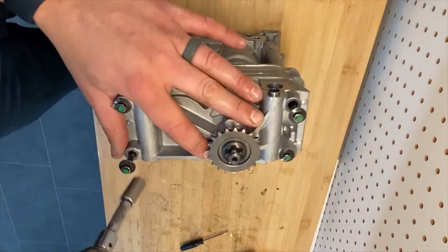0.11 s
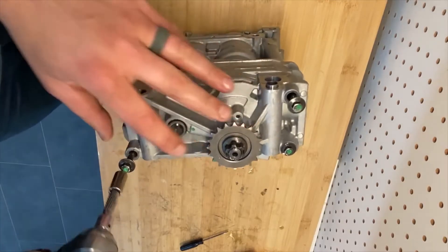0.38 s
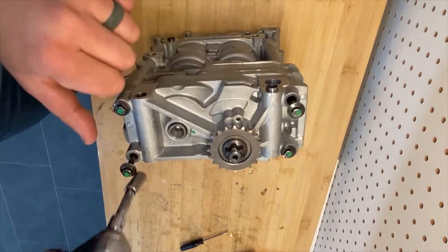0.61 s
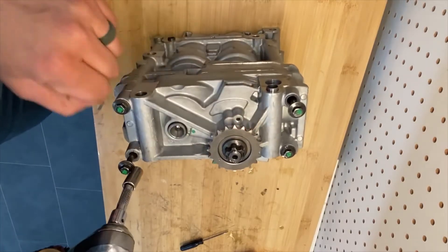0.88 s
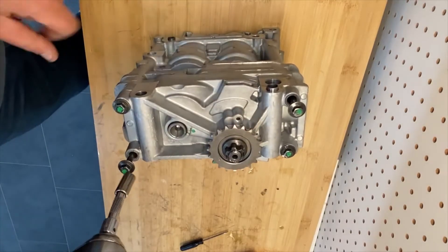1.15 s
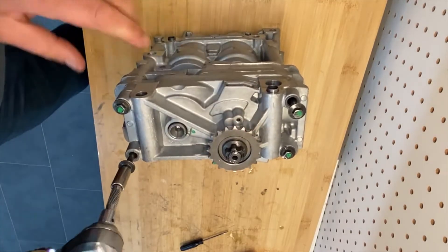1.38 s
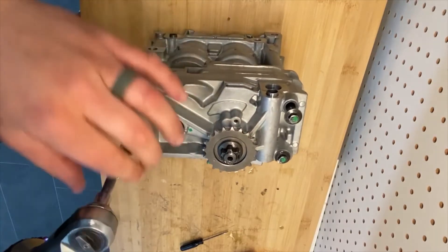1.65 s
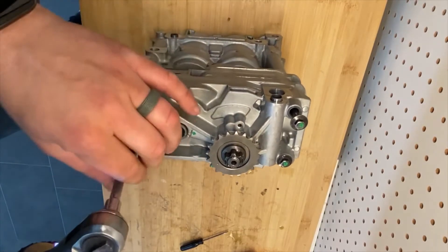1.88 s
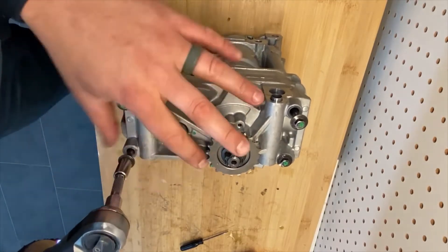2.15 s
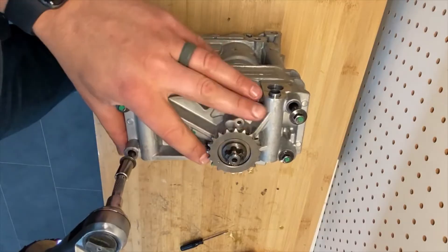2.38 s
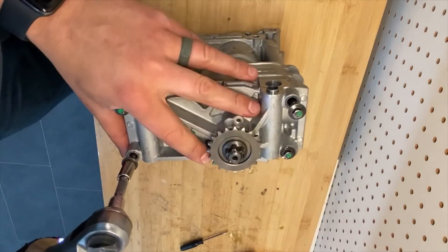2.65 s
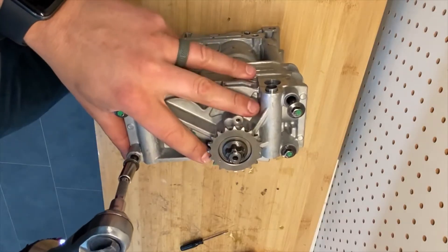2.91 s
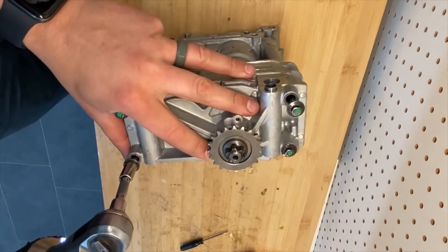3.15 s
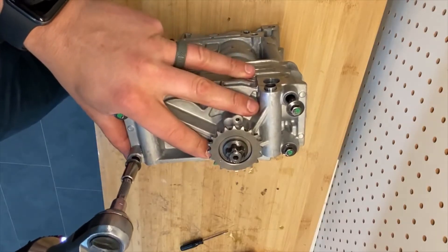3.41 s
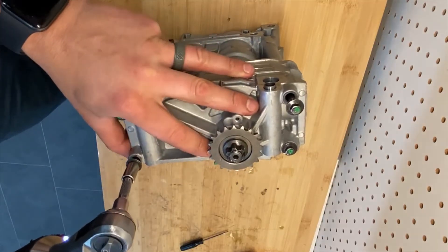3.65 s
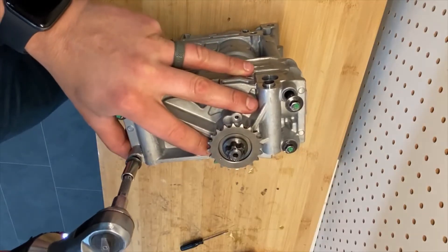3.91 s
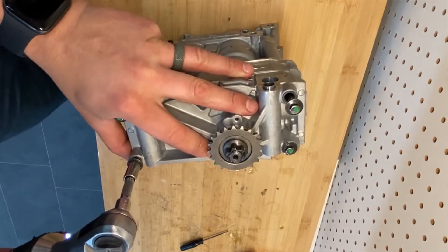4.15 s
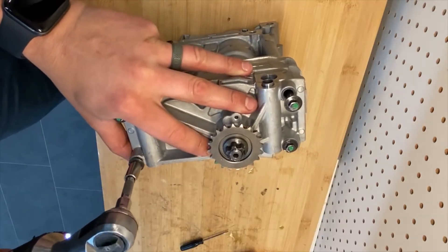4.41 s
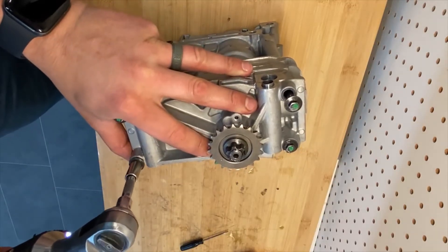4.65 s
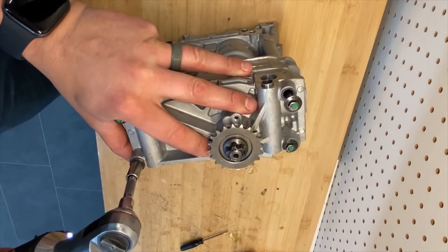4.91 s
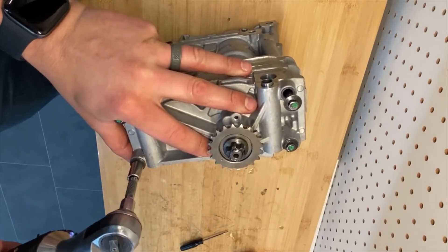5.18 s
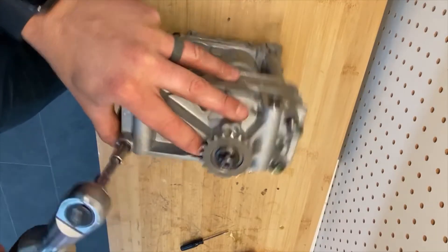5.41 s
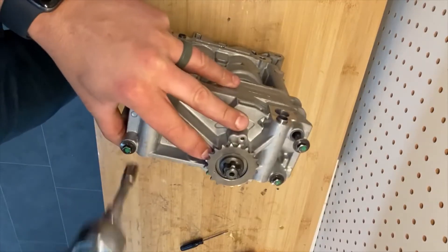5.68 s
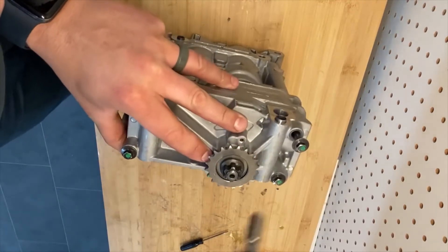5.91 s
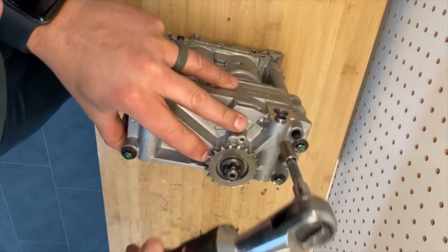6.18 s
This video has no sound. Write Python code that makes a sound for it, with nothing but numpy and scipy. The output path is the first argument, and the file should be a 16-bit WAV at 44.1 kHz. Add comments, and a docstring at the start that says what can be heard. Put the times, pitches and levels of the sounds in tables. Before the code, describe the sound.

Socket ticks and soft bench thuds, then a cordless ratchet buzzes through one four-second run, sags as the bolt seats, and clunks follow.

```python
"""First a socket ticks against bolt heads and a cast housing bumps a wooden bench, close to a two-port mic.
Then a cordless ratchet runs a bolt down: pawl chatter gated by each crank turn, over whirring gears.
The speed sags twice as the bolt seats, the housing drags on the wood, and ticks and bumps return.
Sparse clicks and noise drive resonant filters for the tool and socket; decaying sines make the bumps.
Bench rumble, air and a short shop reverberation lie behind."""
import sys
import numpy as np
from scipy import signal
from scipy.fft import rfft, irfft
from scipy.io import wavfile
from scipy.ndimage import uniform_filter1d

SR = 44100
rng = np.random.default_rng(int(sys.argv[2]) if len(sys.argv) > 2 else 0)


def how_loud(loudness_db):
    """Turn decibels into a plain amplitude multiplier (0 dB gives 1, 20 dB gives 10)."""
    steps = np.asarray(loudness_db, float) / 20
    return 10 ** steps


def dump_mix(stems):
    """Bounce the given channels to the path in sys.argv[1] as a 16-bit WAV at rate SR."""
    frames = np.atleast_2d(stems).T  # one column per channel
    limited = np.clip(frames, -1, 1)  # hard clip at full scale
    pcm = np.round(limited * 32767).astype(np.int16)
    wavfile.write(sys.argv[1], SR, pcm)


N = 277830
T = np.arange(N) / SR  # time (s)


def evened(x):
    """Scales to rms 1."""
    return x / np.sqrt(np.mean(x ** 2) + 1e-20)


def read(points, hz):
    """Reads a spectrum table along a log-frequency axis."""
    table_hz, value = np.transpose(points)
    return np.interp(np.log(hz + 1), np.log(table_hz + 1), value)


def level(rows, column=1):
    """Gain drawn along a dB column, silent outside its rows."""
    rows = np.array(rows)
    return how_loud(np.interp(T, rows[:, 0], rows[:, column], left=-200, right=-200))


def colour(x, points, rings=(), tilt_db=0):
    """Minimum-phase filter: a smooth spectrum with resonant peaks on it, tilted in dB per octave."""
    if x.ndim > 1:
        return np.array([colour(channel, points, rings, tilt_db) for channel in x])
    hz = np.fft.rfftfreq(4096, 1 / SR)
    peaks = 1 + sum(how_loud(2 * db) / (1 + (2 * (hz - f) / width) ** 2) for f, width, db in rings)
    smooth = how_loud(read(points, hz) + tilt_db * np.log2((hz + 1) / 5000))
    log_gain = np.log(smooth * np.sqrt(peaks) + 1e-5)
    full = np.r_[log_gain, log_gain[-2:0:-1]]
    taps = np.fft.ifft(np.exp(np.conj(signal.hilbert(full)))).real[:2048]
    return signal.oaconvolve(x, taps / np.linalg.norm(taps))[:len(x)]


def clicks(per_s, spread_db):
    """Sparse clicks of random sign, a few of them large; rms 1."""
    hit, size, sign = rng.random((N, 3)).T
    height = how_loud(-spread_db * np.log(size + 0.03))
    return evened((hit < per_s / SR) * height * np.sign(sign - .5))


def wander(seconds):
    """Slow random drift of rms 1, smoothed twice over the given time."""
    size = round(seconds * SR / 100)
    slow = uniform_filter1d(uniform_filter1d(rng.standard_normal(N // 100 + 2), size), size)
    return np.interp(np.arange(N) / 100, np.arange(len(slow)), evened(slow))


def hiss(points, alike):
    """Steady noise of a given colour, partly shared by the ports; rms 1."""
    shared, own = rfft(rng.standard_normal((2, N)))
    both = np.array([shared, alike * shared + np.sqrt(1 - alike ** 2) * own])
    return evened(irfft(both * how_loud(read(points, np.fft.rfftfreq(N, 1 / SR))), N))


# crank speed: spin-up, free running, two sags as the bolt seats
# columns: time_s, speed_turns_per_s
CRANK_SPEED = [(1.38, 37.78), (1.48, 73.76), (2.115, 74.545), (4.527, 74.545), (4.752, 50.18),
               (4.885, 73.41), (4.916, 76.65), (5.22, 44.66), (5.282, 54.42), (5.42, 55.9)]
START_TURN = .78  # turns
FREE_SPEED = 74.5  # turns per s


def crank():
    """Integrates speed into turns of the crank, whole at the middle of each pawl stroke."""
    s, per_s = np.transpose(CRANK_SPEED)
    return START_TURN + np.cumsum(np.interp(T, s, per_s) * (T >= s[0])) / SR


def slowed(slope_db):
    """Gain that follows crank speed, 1 at free speed; slope in dB per octave of speed."""
    return how_loud(slope_db * np.log2(np.interp(T, *np.transpose(CRANK_SPEED)) / FREE_SPEED))


def per_turn(turns, spread_db):
    """A new random gain for every crank turn."""
    return how_loud(spread_db * rng.standard_normal(400))[np.floor(turns + .5).astype(int)]


# colour of the air noise
# columns: pitch_hz, level_db
AIR_COLOUR = [(30, -6), (90, 4.5), (150, -17.5), (370, -23.5), (770, -26), (3000, -46), (10000, -54.5),
              (12500, -57.5), (13500, -90.5)]
AIR_DB = -62
HUM_HZ, HUM_DB = 372, -80.5  # a faint steady tone


def air():
    """Steady coloured noise with a faint sine under it."""
    return how_loud(AIR_DB) * hiss(AIR_COLOUR, 0.62) + how_loud(HUM_DB) * np.sin(2 * np.pi * HUM_HZ * T)


# how long the shop rings on in each band
# columns: pitch_hz, t60_s
SHOP_DECAY = [(100, 0.51), (500, 1), (1400, 0.75), (3700, 0.46), (7000, 0.44), (10000, 0.14), (13000, 0.36)]


def shop(x):
    """Reverberation: sparse taps of random sign, each band dying at its own speed, other taps per port."""
    taps = np.zeros((2, SR))
    at = np.arange(400, SR - 20, 20) + rng.integers(0, 20, (2, (SR - 401) // 20))
    np.put_along_axis(taps, at, rng.choice([-1., 1.], at.shape), 1)
    hz, t, z = signal.stft(taps, SR, nperseg=256)
    fade = how_loud(-60 * t / read(SHOP_DECAY, hz)[:, None])
    tail = signal.istft(z * fade, SR, nperseg=256)[1]
    tail /= np.linalg.norm(tail[0])
    return signal.fftconvolve(x.mean(0)[None], tail, axes=1)[:, :N]


# colour of the low noise in the bench
# columns: pitch_hz, level_db
RUMBLE_COLOUR = [(25, -21.5), (45, -10), (70, 7), (100, -4.5), (200, -1.5), (300, -18.5), (600, -26.5),
                 (1500, -48.5)]
RUMBLE_DB, RUMBLE_LUMPS_DB, RUMBLE_SLOPE_DB = -48.5, 4, 5.5  # slope: dB per octave of speed
RUMBLE_SWELL_DB, SWELL_TURNS, SWELL_DIP = -0.5, 14, .34  # dip: share of the swell cycle at its lowest
AFTER_DB, AFTER_T60_S = -14, 0.91  # the bench rumbles on after a thud: level under the thud, decay
OPENING_DB, OPENING_T60_S = -55.5, 1.2  # a low rumble at the outset, dying away


def rumble(turns):
    """Lumpy low noise in the bench: swelling while the tool runs, dying away after each thud."""
    running = (T > RUN_LEVELS[2][0]) & (T < RUN_LEVELS[-2][0])
    swell_db = RUMBLE_SWELL_DB * np.cos(2 * np.pi * (turns / SWELL_TURNS - SWELL_DIP))
    lumps_db = RUMBLE_LUMPS_DB * wander(.03)
    size = running * slowed(RUMBLE_SLOPE_DB) * how_loud(RUMBLE_DB + swell_db + lumps_db)
    size += how_loud(OPENING_DB - 60 * T / OPENING_T60_S)
    after_power = sum((T > s) * how_loud(2 * (thud_db + AFTER_DB - 60 * abs(T - s) / AFTER_T60_S))
                      for s, thud_db, _ in BENCH_BUMPS)
    return (uniform_filter1d(size, 400) + np.sqrt(after_power)) * hiss(RUMBLE_COLOUR, 0.85)


def ring(modes, rise_s):
    """Modes that swell in as the blow spreads, each blow landing elsewhere; peak 1."""
    t = np.arange(SR // 2) / SR
    spot_db = 0.96 * rng.standard_normal(len(modes))
    sound = np.zeros(len(t))
    for k, (hz, db, t60) in enumerate(modes):
        sound += (-1) ** k * how_loud(db + spot_db[k] - 60 * t / t60) * np.sin(2 * np.pi * hz * t)
    sound *= 1 - np.exp(-(t / rise_s) ** 2)
    return sound / abs(sound).max()


# the housing landing on the bench
# columns: start_s, thud_peak_db, knock_peak_db
BENCH_BUMPS = [(.029, -54, -65), (0.139, -52, -70), (0.257, -46, -61), (0.605, -33.5, -52),
               (0.698, -47.5, -64), (1.223, -40, -59), (1.378, -57, -46), (1.432, -36, -60),
               (1.496, -36, -63), (4.999, -44.5, -60.5), (5.361, -29.5, -49), (5.38, -31, -34),
               (5.40, -32, -55), (5.429, -47, -55), (5.497, -30, -38), (5.532, -37, -51),
               (5.727, -48, -70.5), (5.837, -48, -65), (5.91, -53.5, -70), (6.221, -30, -43)]
# bending modes of the bench top, heard as the thud
# columns: pitch_hz, level_db, t60_s
BENCH_MODES = [(52, -6.5, .3), (68, -0.5, .25), (96.9, 7, 0.2), (168, 0.5, 0.15), (185, 2.5, 0.11),
               (263, -5.5, 0.12)]
# modes of the cast housing, heard as the knock
# columns: pitch_hz, level_db, t60_s
HOUSING_MODES = [(330, 5, 0.078), (367, 6, 0.059), (524, -12, .06), (728, -5.5, 0.08), (937, -6.5, 0.18),
                 (1090, -6.5, 0.059), (1260, -9.5, .04)]


def bumps():
    """A short knock in the housing and a slower thud in the bench, both ringing modes."""
    out = np.zeros(N + SR)
    for s, thud_db, knock_db in BENCH_BUMPS:
        blow = how_loud(thud_db) * ring(BENCH_MODES, 0.011) + how_loud(knock_db) * ring(HOUSING_MODES, 0.0009)
        out[round(s * SR):][:SR // 2] += blow
    return out[:N]


# the housing drags round on the wood as the bolt locks
# columns: time_s, level_db
DRAG_LEVEL = [(5.2, -55.5), (5.378, -39), (5.436, -69)]
# colour of metal on wood
# columns: pitch_hz, level_db
DRAG_COLOUR = [(150, -31.5), (350, -0.5), (600, 1.5), (1100, -3.5), (1600, -4), (3000, -24)]


def drag():
    """Uneven slips of metal on wood: sparse clicks, slightly shared by the ports, through a filter."""
    slips = np.array([clicks(900, 3.0) for _ in "lr"])
    return colour((slips + 0.14 * slips[::-1]) * level(DRAG_LEVEL), DRAG_COLOUR)


# socket on bolt head
# columns: start_s, level_db, ring_hz, brightness_db_per_octave
SOCKET_TICKS = [(0.1087, -47, 11800, 3), (0.12, -50, 11700, -1.5), (0.24, -40, 11900, 3),
                (0.2515, -40.5, 7500, -0.5), (0.333, -58, 3170, 2), (0.354, -55, 7300, 1.5),
                (0.4794, -60.5, 3910, 3), (0.5424, -51, 1390, -6.5), (0.5953, -42, 3820, -1),
                (0.599, -34, 3900, 8.5), (0.607, -38, 9460, -1.5), (0.98, -53.5, 6340, 9.5),
                (1.1558, -58, 4730, 2), (1.207, -54, 11200, 2), (1.216, -44.5, 10900, 3.5),
                (1.2254, -42, 10500, 0), (1.269, -64, 1210, -5), (5.574, -54, 4880, -1),
                (5.595, -47, 4270, 5), (5.6902, -50.5, 4300, -3), (5.8538, -58, 2290, 3),
                (5.8668, -56.5, 1200, -2), (5.9656, -63, 1344, -3), (6.054, -63, 1260, -2),
                (6.0808, -59, 4310, -1.5), (6.125, -56, 1210, -7), (6.1592, -57, 5630, -1),
                (6.166, -60, 9800, 4), (6.2119, -29, 5120, 7.5), (6.2195, -26, 11000, -1),
                (6.241, -44, 1640, -12)]
# common colour of the ticks
# columns: pitch_hz, level_db
TICK_COLOUR = [(240, -33.5), (400, -8), (645, -12.5), (1200, -6.5), (3070, -3.5), (5190, -1), (8900, -8),
               (10900, -3.5), (16000, -16)]
SLIDE_S, AFTER_S = 0.0052, 0.019  # decay times of the slide and of the rattle after it
TICK_PAN_DB = 3  # left minus right


def ticks():
    """Each tick is a gritty slide of steel on steel; the casting rattles on, duller, after it."""
    length = 3000
    out, t = np.zeros((2, N + length)), np.arange(length) / SR
    pan = how_loud(np.array([[TICK_PAN_DB], [-TICK_PAN_DB]]) / 2)
    for s, db, ring_hz, bright_db in SOCKET_TICKS:
        grit = rng.standard_normal((6, length))
        chatter = how_loud(1.7 * evened(uniform_filter1d(grit[5], 40)))  # the contact skips
        slide = (grit[0] + .5 * grit[1:3]) * chatter * np.exp(-t / SLIDE_S)
        after = grit[3:5] * how_loud(-8.5) * np.exp(-t / AFTER_S)
        rings = [(ring_hz, .25 * ring_hz, 7)]
        sound = colour(slide, TICK_COLOUR, rings, bright_db)
        sound += colour(after, TICK_COLOUR, rings, bright_db - 3.0)
        attack = np.minimum(t / 0.0024, 1)
        out[:, round(s * SR):][:, :length] += how_loud(db) * pan * sound * attack / 2
    return out[:, :N]


# balance of the tool between the ports
# columns: pitch_hz, left_minus_right_db
TOOL_BALANCE = [(60, -2), (110, -4.5), (200, -17.5), (380, 3), (700, -6.5), (1290, -1), (2380, -2.5),
                (4400, 5.5), (8120, 0), (15000, -1.5)]


def ports(near, other, alike, trail):
    """The left port trails by a phase; its unlike share comes from another patch of the tool."""
    hz = np.fft.rfftfreq(N, 1 / SR)
    share = np.clip(read(alike, hz), 0, 1)
    tilt = how_loud(read(TOOL_BALANCE, hz) / 2)
    left = share * rfft(near) * np.exp(-1j * trail(hz)) + np.sqrt(1 - share ** 2) * rfft(other)
    return np.array([irfft(left * tilt, N), irfft(rfft(near) / tilt, N)])


SHAKE_DB, SHAKE_WAVER_DB, SHAKE_SLOPE_DB = -47, 2, 29.5  # rms at free speed; slope per octave of speed
SEATED_S, SEATED_DB, SEATING_S = 4.35, -8, .3  # the shake weakens: middle, change, duration


def shake(turns):
    """Once-a-turn shake in the bench: a wavering sine, weaker as the bolt comes home."""
    running = (T > RUN_LEVELS[0][0]) * (T < RUN_LEVELS[-2][0])
    size = running * slowed(SHAKE_SLOPE_DB) * how_loud(SHAKE_DB + SHAKE_WAVER_DB * wander(.03))
    size *= how_loud(SEATED_DB * np.clip((T - SEATED_S) / SEATING_S + .5, 0, 1))
    return np.sqrt(2) * size * np.sin(2 * np.pi * (turns + 0.39))


# low crank orders, before the run level is applied
# columns: multiple_of_crank_speed, level_db
CRANK_ORDERS = [(2, -60), (3, -64), (5, -67), (6, -67), (7, -71), (10, -68), (11, -71), (12, -66),
                (16, -68), (22, -69), (28, -65), (30, -66)]
WHIR_SLOPE_DB = 5.5  # loss per octave of speed as the crank slows


def crank_tones(turns):
    """Low crank orders sound as wavering sines, of independent phase at each port."""
    tones = np.zeros((2, N))
    for order, db in CRANK_ORDERS:
        waver = evened(uniform_filter1d(rng.standard_normal(N // 100 + 1), 30)).repeat(100)[:N]
        phase = 2 * np.pi * (order * turns + rng.random((2, 1)))
        tones += how_loud(db + 3 * uniform_filter1d(waver, 400)) * np.sin(phase)
    return tones * level(RUN_LEVELS) * slowed(WHIR_SLOPE_DB) / how_loud(-37.0)


# base levels from trigger to stop; the rattle drops quickly near 5.04 s
# columns: time_s, gear_whir_db, pawl_rattle_db
RUN_LEVELS = [(1.352, -80, -73), (1.372, -45, -56), (1.385, -33, -25.5), (1.42, -29.5, -22),
              (1.9, -29, -23.5), (2.1, -32, -25), (4.55, -33.5, -27), (4.57, -33, -27),
              (4.82, -35.5, -26.5), (5.03, -32, -25.5), (5.05, -34.5, -28), (5.25, -34.5, -25),
              (5.36, -29, -27), (5.4, -40, -36), (5.425, -55, -56)]
# the gears are louder through the middle of the turn
# columns: share_of_turn, level_db
MESH_LOAD = [(0, -2), (.35, 1.5), (.65, 1.5), (.76, 1.5), (.85, 0), (1, -1.5)]
# colour of the gear case
# columns: pitch_hz, level_db
GEAR_COLOUR = [(150, -48.5), (250, -20.5), (400, -14.5), (700, -19), (950, -12), (1300, -12), (1500, -13.5),
               (1750, -10.5), (2300, -12), (2850, -7), (3200, -3.5), (3900, -2), (5000, -3), (6400, -8),
               (9000, -7.5), (11500, -35)]
# resonances of the gear case
# columns: pitch_hz, width_hz, level_db
CASE_RINGS = [(2068, 14, 7.5), (3910, 150, 0.5), (4390, 72, 2), (5140, 27, -10.5), (5870, 88, 4.5)]
# likeness of the ports for the gears
# columns: pitch_hz, left_right_likeness (0 to 1)
GEAR_LIKENESS = [(250, .5), (700, .4), (1400, .6), (2200, .4), (3400, .5), (5000, .3), (6500, .1),
                 (9000, .5)]
# phase by which the left port trails for the gear case
# columns: pitch_hz, phase_radians
GEAR_PHASE = [(250, 3), (700, 1.5), (1500, 2.5), (2600, 0.5), (4400, -2), (5500, -2), (6200, 14.5),
              (9000, -3)]


def gears(turns):
    """Dense tooth contacts, noise and a once-a-turn knock ring the case."""
    load = how_loud(np.interp((turns + .5) % 1, *np.transpose(MESH_LOAD))) * per_turn(turns, 0.78)
    load *= level(RUN_LEVELS) * slowed(WHIR_SLOPE_DB)
    load *= how_loud(0.94 * evened(uniform_filter1d(rng.standard_normal(N), 120)))  # teeth meet unevenly
    # the yoke takes up its play once a turn
    knock = np.diff(np.floor(turns - .25), prepend=0) * how_loud(13.0) * per_turn(turns, 2.2)
    drive = [(clicks(3500, 2.82) + 0.41 * rng.standard_normal(N) + knock) * load for _ in "ab"]
    near, other = colour(np.array(drive), GEAR_COLOUR, CASE_RINGS)
    return how_loud(2.0) * ports(near, other, GEAR_LIKENESS, lambda hz: read(GEAR_PHASE, hz))


# the pawl chatters through part of every turn
# columns: share_of_turn, level_db
PAWL_STROKE = [(0, -10.5), (.26, -8), (.33, 1.5), (.6, -2.5), (.72, -5), (1, -13)]
# the hardest clacks, as drive into the pawl filter
# columns: start_s, drive_db
PAWL_CLACKS = [(1.4073, -20), (1.4237, -11.5), (1.4416, -8.5), (1.581, -1.5), (1.648, -3.5), (1.7702, -6.5),
               (1.9057, -9.5), (1.9596, -3), (2.431, -6), (2.535, -12), (2.656, -4), (2.8035, -5.5),
               (2.8563, -7), (3.0464, -12.5), (3.1657, -6.5), (3.221, -12), (3.3546, -9.5), (4.547, -3.5),
               (4.7081, -9), (4.7994, -12), (4.862, -12), (4.9564, -10.5), (5.0277, -9), (5.2343, -12),
               (5.344, -12.5), (5.412, -18)]
# colour of the pawl
# columns: pitch_hz, level_db
PAWL_COLOUR = [(1500, -36.5), (5000, -25), (7500, -13), (9000, -10), (10500, -9), (12000, -8.5),
               (13500, -16), (16000, -22)]
# resonances of the pawl
# columns: pitch_hz, width_hz, level_db
PAWL_RINGS = [(8100, 500, -18), (9920, 257, 10.5), (9960, 54, 2), (10200, 90, -8.5), (10790, 120, 5.5)]
# likeness of the ports for the pawl
# columns: pitch_hz, left_right_likeness (0 to 1)
PAWL_LIKENESS = [(7500, .5), (8800, .75), (10000, .99), (11200, .96), (12400, .65), (13400, .92),
                 (14600, .4)]
LEFT_LAG_S = .000184  # the tool is nearer the right port
RATTLE_SLOPE_DB = 9  # loss per octave of speed as the crank slows
STROKE_OPENS = .33  # lesser clacks fall where the stroke opens (share of the turn)
LESSER_DB, LESSER_SPREAD_DB = 4., 6.  # their level over the rattle and its spread


def pawl(turns):
    """Clicks gated by the turn, each stroke of its own strength, plus clacks, ring the pawl."""
    rattle = level(RUN_LEVELS, column=2) * slowed(RATTLE_SLOPE_DB)
    gate = how_loud(np.interp((turns + .5) % 1, *np.transpose(PAWL_STROKE))) * per_turn(turns, 1.14)
    chatter = gate * how_loud(2.0) * rattle / np.sqrt(np.mean(gate ** 2))
    hits = np.diff(np.floor(turns + .5 - STROKE_OPENS), prepend=0) * rattle
    hits *= how_loud(LESSER_DB) * per_turn(turns, LESSER_SPREAD_DB)
    for s, db in PAWL_CLACKS:
        hits[round(s * SR)] = how_loud(db)
    t = np.arange(500) / SR
    burst = np.exp(-t / 0.002) * np.minimum(t / 0.0013, 1)  # a clack rattles for a few milliseconds
    hits = np.convolve(hits, burst)[:N]
    drive = [clicks(4100, 0.96) * chatter + np.sign(rng.standard_normal(N)) * hits for _ in "ab"]
    near, other = colour(np.array(drive), PAWL_COLOUR, PAWL_RINGS)
    return ports(near, other, PAWL_LIKENESS, lambda hz: 2 * np.pi * hz * LEFT_LAG_S)


def scene():
    """Tool, ticks, bumps and drag in the shop, over bench rumble and air."""
    turns = crank()
    tool = pawl(turns) + gears(turns) + crank_tones(turns) + shake(turns)
    near = tool + ticks() + bumps() + drag()
    return near + how_loud(-15.0) * shop(near) + rumble(turns) + air()


MIC_LOW_HZ, EDGE_HZ = 48.1, 15850  # bass roll-off and upper band limit


def top_cut(x):
    """Nothing passes above the cut-off."""
    return signal.sosfilt(signal.butter(12, 16660, fs=SR, output="sos"), x)


def record(dry):
    """Microphone bass roll-off, then a steep treble limit."""
    bass_cut = signal.butter(2, MIC_LOW_HZ, "high", fs=SR, output="sos")
    rolled = signal.sosfilt(bass_cut, dry)
    taps = signal.firwin(255, EDGE_HZ, window=("kaiser", 9), fs=SR)
    mix = signal.oaconvolve(rolled, taps[None], "same")
    return top_cut(mix)


dry = scene()
out = record(dry)
dump_mix(out)
```